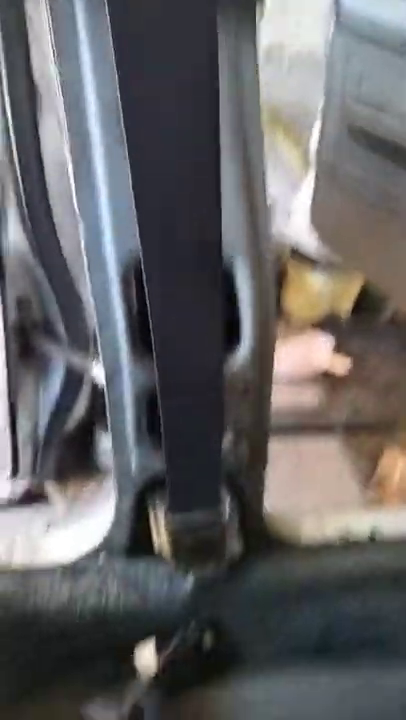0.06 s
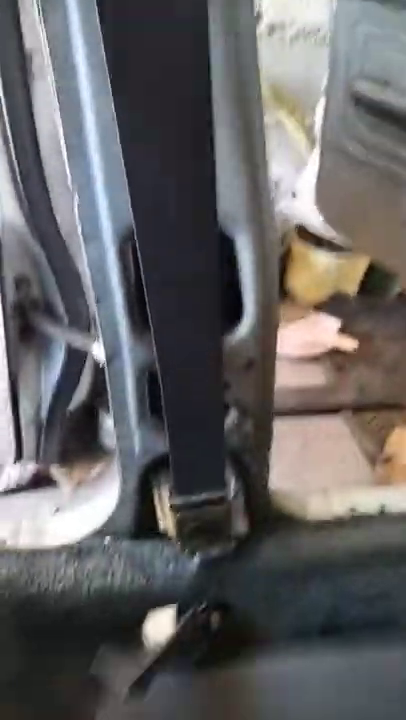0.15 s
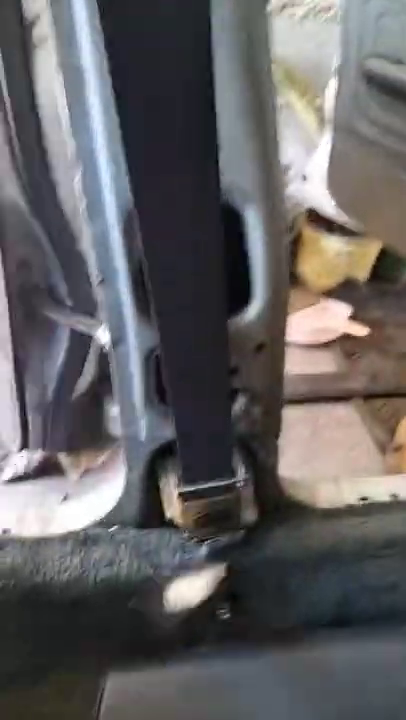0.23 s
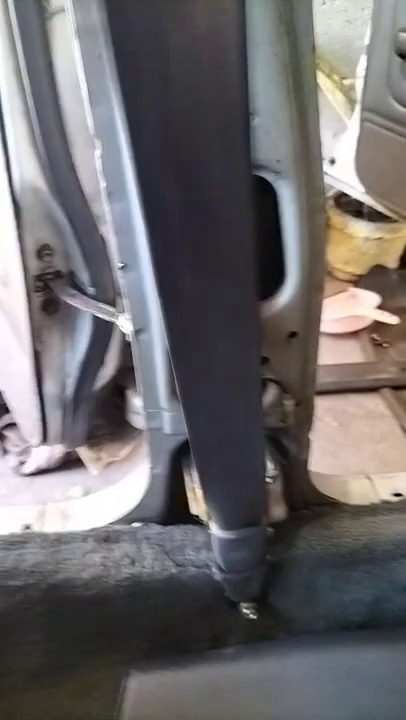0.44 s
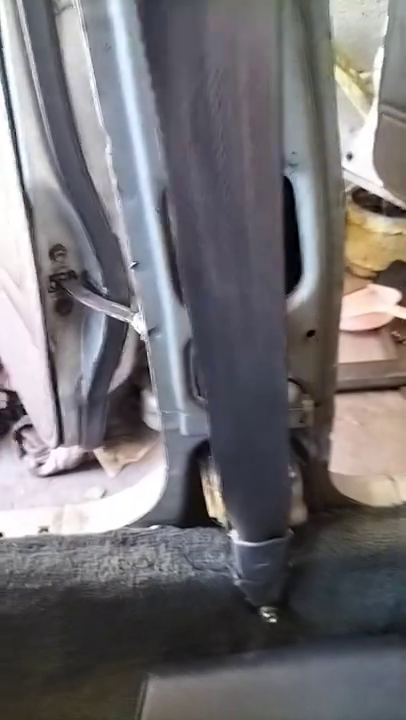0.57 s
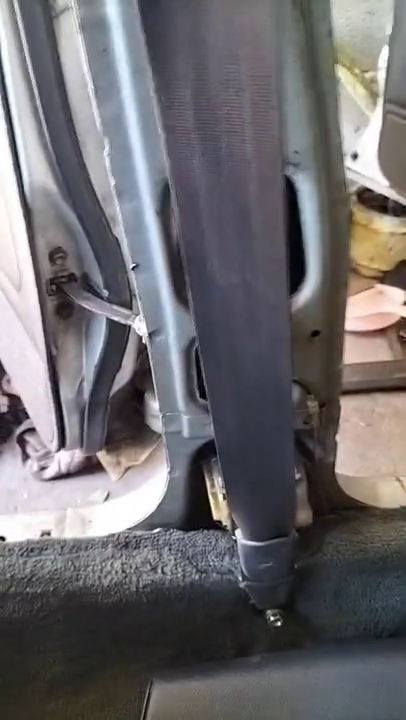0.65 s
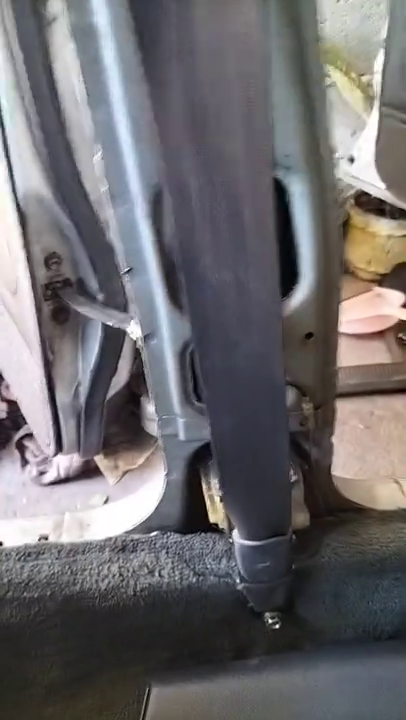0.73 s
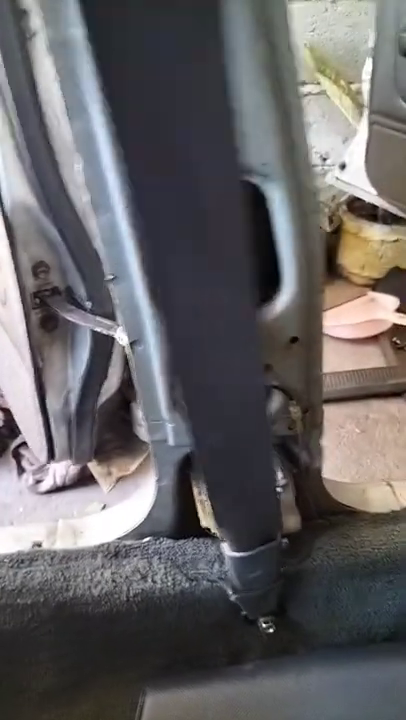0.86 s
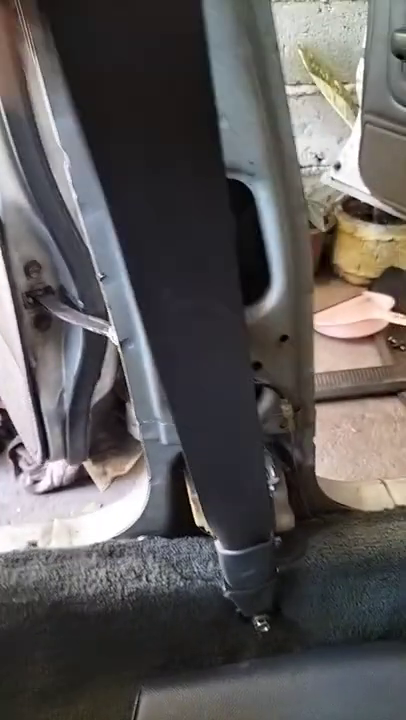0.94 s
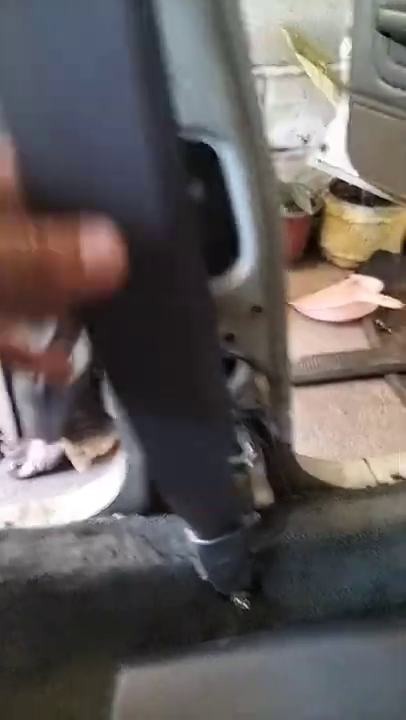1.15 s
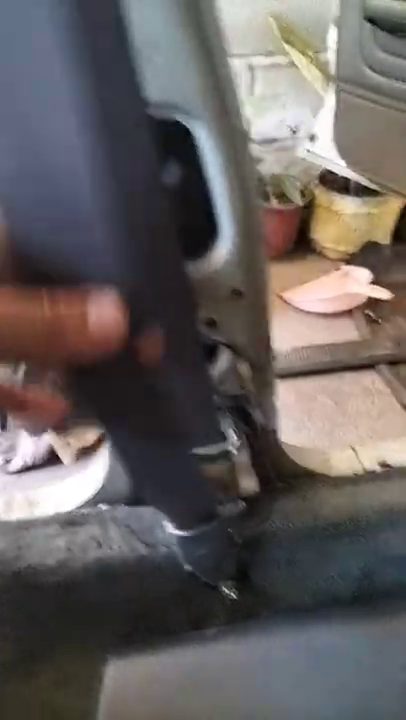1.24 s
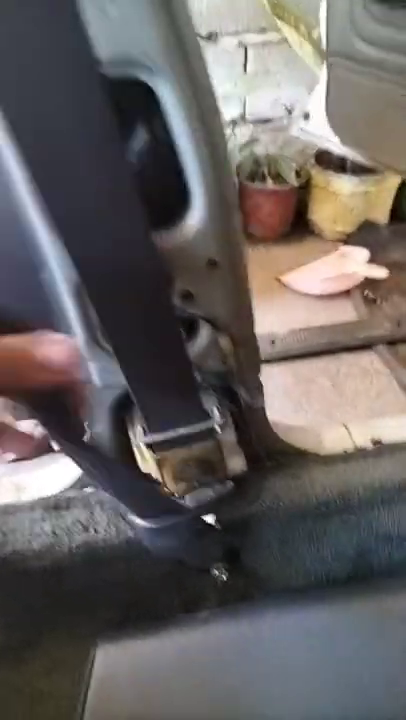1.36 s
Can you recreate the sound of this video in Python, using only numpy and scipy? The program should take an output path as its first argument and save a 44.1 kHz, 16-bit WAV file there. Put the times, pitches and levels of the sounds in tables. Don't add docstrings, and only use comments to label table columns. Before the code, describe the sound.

Seat belt webbing whips back onto its reel, whining upward, slapping and rattling before a sharp latch click; afterward small jerks, a trim creak and soft hand rubs over quiet yard air, close phone microphone.

```python
import sys
import numpy as np
from scipy import signal
from scipy.fft import rfft, irfft
from scipy.io import wavfile
from scipy.ndimage import uniform_filter1d

SR = 44100
rng = np.random.default_rng(int(sys.argv[2]) if len(sys.argv) > 2 else 0)


def store_wav(level_fs):
    pcm = np.round(np.clip(np.atleast_2d(level_fs), -1, 1) * 32767)
    wavfile.write(sys.argv[1], SR, pcm.T.astype(np.int16))


def attenuation_scalar(level_db):
    decades = np.asarray(level_db, float) / 20
    return 10 ** decades


N = 61739


def evened(x):
    return x / np.sqrt(np.mean(x ** 2) + 1e-20)


def curve(points, column=1):
    p = np.array(points)
    return np.interp(np.arange(N) / SR, p[:, 0], p[:, column])


def colour(x, points):
    f, db = np.transpose(points)
    hz = np.fft.rfftfreq(len(x), 1 / SR)
    gain = attenuation_scalar(np.interp(np.log(hz + 1), np.log(f + 1), db, -90, -90))
    return evened(irfft(rfft(x) * gain, len(x)))


def drift(seconds):
    size = max(int(seconds * SR), 2)
    return evened(uniform_filter1d(uniform_filter1d(rng.standard_normal(N), size), size))


def resonate(x, hz, width):
    turn = np.exp(2j * np.pi * hz * np.arange(len(x)) / SR)
    r = np.exp(-np.pi * width / SR)
    return 2 * (turn * signal.lfilter([1 - r], [1, -r], x / turn)).real


def twice(x, hz, width):
    return resonate(resonate(x, hz, width), hz, width)


def ring(modes, cycles, tune):
    t = np.arange(4000) / SR
    out = np.zeros(4000)
    for (hz, db), k in zip(modes, tune):
        out += attenuation_scalar(db - 60 * t * hz / cycles) * np.sin(2 * np.pi * hz * k * t)
    return np.minimum(t / 0.0004, 1) * out


def add(mix, s, sound):
    part = mix[round(s * SR):][:len(sound)]
    part += sound[:len(part)]


def grains(per_s, spread_db):
    u = rng.random((N, 2))
    size = attenuation_scalar(-spread_db * np.log(u[:, 1] + 0.03))
    return (u[:, 0] < per_s / SR) * size * rng.standard_normal(N)


def echo(x, t60):
    tail = rng.standard_normal(12000) * attenuation_scalar(-60 * np.arange(12000) / SR / t60)
    return signal.fftconvolve(x, tail / np.linalg.norm(tail))[:N]


def glides(table, wobble, smear_s):
    out = np.zeros(N)
    for s, length, db, first_hz, last_hz in table:
        u = np.arange(0, length, 1 / SR) / length
        z = uniform_filter1d(rng.standard_normal((2, 9000)), max(int(smear_s * SR), 2))
        z = z[:, :len(u)] * np.sqrt(smear_s * SR)
        turn = np.exp(2j * np.pi * np.cumsum(first_hz + (last_hz - first_hz) * u) / SR)
        blurred = (turn * (1 - wobble + wobble * (z[0] + 1j * z[1]))).real
        add(out, s, attenuation_scalar(db + 4.5) * np.sin(np.pi * u) ** 0.42 * blurred)
    return out


def streaks(x):
    width_share, wander_db = .02, 4.
    out = np.zeros(N)
    for hz in np.geomspace(1200, 8500, num=36):
        out += attenuation_scalar(wander_db * drift(.06)) * resonate(x, hz, width_share * hz)
    return evened(out)


def yard():
    # pitch_hz, level_db
    air = [(25, -33), (71, -0.5), (359, -10), (800, -9), (1000, -16.5), (2050, -20.5), (3700, -14),
           (5000, -23.5), (8500, -32.5)]
    # pitch_hz, width_hz, level_db
    hums = [(39.2, 5.5, -88.5), (62.8, 14, -77.5), (87.7, 13, -79.5), (175.6, 23, -89)]
    # time_s, level_db
    swell = [(0, -7.5), (.7, 0.5), (1.05, 1.5), (1.2, 10), (1.4, 2)]
    drone = sum(attenuation_scalar(db) * evened(twice(rng.standard_normal(N), hz, w)) for hz, w, db in hums)
    breeze = attenuation_scalar(-73.5 + 0.86 * drift(0.11)) * colour(rng.standard_normal(N), air)
    return breeze + attenuation_scalar(curve(swell)) * drone


def sparrows():
    # start_s, length_s, level_db, first_hz, last_hz
    chirps = [(.6, .045, -67, 4000, 3450), (.738, .028, -63, 2930, 2800), (.765, .025, -76, 2700, 2450),
              (.755, .04, -75, 4300, 4050), (.88, .045, -75, 3100, 2900), (1.19, .03, -69, 3880, 3780),
              (1.21, .03, -71, 3600, 3300), (1.345, .03, -72, 4100, 3800), (1.355, .045, -69, 3600, 3450),
              (1.37, .03, -75, 4520, 4480)]
    out = glides(chirps, .35, .004)
    return out + attenuation_scalar(-8) * echo(out, .1)


def rub():
    # time_s, level_db
    strokes = [
        [(0, -70), (.054, -74), (.06, -62.5), (.11, -72)],
        [(.86, -87), (.92, -70.5), (1, -69.5), (1.09, -65.5), (1.4, -71)],
    ]
    # pitch_hz, level_db
    cloth = [(1000, -3), (1900, -10), (3770, -2.5), (6980, -3.5), (8000, -9), (9500, -22.5)]
    level_db = curve(strokes[0] + [(.2, -99), (.75, -99)] + strokes[1])
    return attenuation_scalar(level_db - 3.5) * streaks(colour(grains(5600, 0.63), cloth))


def swishes():
    # start_s, length_s, level_db, first_hz, last_hz
    sweeps = [(1.1, 0.053, -71, 5100, 4700), (1.06, 0.092, -78.5, 6000, 5600),
              (0.96, 0.063, -76.5, 7200, 8000), (1.25, .07, -74, 5200, 4800),
              (.058, 0.031, -74.5, 7900, 5500), (0.071, 0.016, -87, 5100, 2800),
              (0.81, .05, -76, 2500, 3100), (1.4, 0.056, -79, 5300, 5000), (1.3, .07, -82.5, 8300, 5900),
              (1.03, 0.074, -86, 8600, 7400)]
    return glides(sweeps, 0.73, 0.006)


def creaks():
    # start_s, length_s, level_db, slip_rate_hz, roughness (0-1)
    slipping = [(.948, .054, -54.5, 344, .05)]
    # pitch_hz, width_hz, level_db
    trim = [(345, 90, -20), (470, 90, -8), (689, 90, -1), (830, 120, -8), (1030, 50, -1), (1400, 250, -8),
            (1650, 200, -11), (2300, 500, -11)]
    grit = .16
    out, t = np.zeros(N), np.arange(8000) / SR
    for s, length, db, hz, rough in slipping:
        z = rng.standard_normal((2, 8000))
        turns = np.cumsum(hz * (1 + 8.0 * rough * uniform_filter1d(z[0], 150))) / SR
        slips = np.diff(np.floor(turns), prepend=0) * (1 + rough * z[1]) + grit * z[1]
        rise = t / (0.13 * length * (1.05 - rough))
        fall = (length - t) / (0.31 * length)
        push = slips * np.clip(np.minimum(rise, fall), 0, 1)
        body = sum(attenuation_scalar(g) * resonate(resonate(push, f, w), f, 2 * w) / w for f, w, g in trim)
        add(out, s, attenuation_scalar(db) * body / np.std(body[:round(length * SR)]))
    return out


def jerks():
    # start_s, length_s, level_db
    tugs = [(.8155, .03, -61.5), (.84, 0.043, -68.5), (.912, 0.06, -64.5), (1.05, 0.15, -80),
            (0.06, 0.035, -74.5)]
    # pitch_hz, width_hz, level_db
    slot = [(307, 180, -8), (592, 190, -2), (824, 97, -5.5), (1069, 170, -0.5), (1215, 30, -9),
            (2380, 610, -16)]
    out, t = np.zeros(N), np.arange(8000) / SR
    for s, length, db in tugs:
        fade = np.clip((length - t) / (0.21 * length), 0, 1)
        scrape = rng.standard_normal(8000) * fade * (1 + 2.2 * np.exp(-t / 0.0032))
        body = sum(attenuation_scalar(g) * twice(scrape, f, 0.79 * w) / np.sqrt(w) for f, w, g in slot)
        add(out, s, attenuation_scalar(db) * body / np.std(body[:round(length * SR)]))
    return out


def squeaks():
    # start_s, length_s, level_db, first_hz, last_hz
    songs = [(.163, 0.033, -65.5, 1530, 1570), (.187, 0.037, -61.5, 1700, 1900),
             (0.15, 0.066, -65, 3900, 4020), (0.091, 0.035, -74, 5400, 3950),
             (0.29, 0.014, -72, 2600, 3560), (.278, 0.033, -58.5, 1700, 1540),
             (0.32, 0.018, -67, 3800, 5500), (0.37, .05, -58, 2600, 4700), (0.31, .026, -49.5, 1000, 620),
             (.845, 0.035, -71, 600, 540), (.93, 0.037, -70, 324, 340), (.404, 0.028, -45.5, 600, 520),
             (.912, 0.041, -65, 1100, 1200), (1.035, 0.035, -74.5, 1400, 1600),
             (1.07, 0.12, -79, 1230, 1200), (0.9, .028, -75.5, 1045, 1022)]
    return glides(songs, .25, 0.0042)


def slaps():
    # start_s, length_s, level_db, first_hz, last_hz
    thuds = [(.435, .05, -52, 215, 170), (.19, .075, -56, 285, 315), (.38, .08, -66, 125, 95),
             (.315, .03, -49, 310, 325), (.378, .03, -46, 330, 320), (.275, .045, -60, 195, 165),
             (.48, .022, -54, 310, 300), (.535, .025, -62, 310, 330), (.48, .07, -62, 180, 140)]
    return glides(thuds, .35, 0.016)


def pawl():
    # start_s, peak_db
    hits = [
        (0.5762, -31),
        (0.5809, -54),
        (0.585, -55),
        (0.59, -74),
    ]
    # pitch_hz, level_db
    modes = [(650, -31), (1238, 3.5), (1600, 2.5), (2300, 9), (2750, 9.5), (3510, 5), (4300, 1.5),
             (5300, -17), (7100, -29.5)]
    out = np.zeros(N)
    for s, db in hits:
        detune = 1 + .015 * rng.standard_normal(len(modes))
        tap = ring(modes, 20., detune)
        add(out, s, attenuation_scalar(db) * tap / abs(tap).max())
    return out


def knocks():
    # start_s, level_db, metal_share_db, rattle_s, spot_tilt_db (per octave)
    blows = [(0.3163, -43, -13.5, 0.023, -8), (.347, -53, 0, 0.00415, 2), (0.3778, -38, -36, .02, -1),
             (.4042, -44.5, 5.5, .028, 2), (0.459, -48.5, -22, 0.0068, -10), (.482, -39, -16, 0.021, 0.5),
             (.541, -58, -34, .02, -9.5), (.333, -59, 0, .006, -4), (0.3611, -59.5, -7, 0.0033, -3),
             (0.391, -56, -5.5, 0.00624, 1), (0.448, -52, -20, .006, -9), (.494, -46, -14, 0.021, -2.5)]
    # pitch_hz, level_db
    pillar = [(322, -10), (340, 1.5), (450, -5.5), (590, 4), (720, 5), (850, 1.5), (1030, 13), (1250, -15),
              (1600, -13), (1900, -9)]
    # pitch_hz, level_db
    tongue = [(2200, -10), (2762, 2.5), (3300, 4.5), (3844, 7.5), (4250, -11), (4800, -25), (5600, -3),
              (7456, -5), (8300, -33)]
    contact = 1.
    blow, blow_s, rise_s = 2.1, .0035, 0.0061
    out, t = np.zeros(N), np.arange(2000) / SR
    for s, db, metal_db, rattle, tilt_db in blows:
        z = rng.standard_normal((4, 2000))
        chatter = z[:2] * (z[2] > contact) * np.minimum(t / rise_s, 1)
        hardest = blow * (np.arange(2000) == round(min(blow_s, rattle / 4) * SR))
        drive = (chatter + hardest) * np.exp(-3 * t / rattle)
        tune = 1 + .015 * z[3]
        spot = [(hz, g + tilt_db * np.log2(hz / 700)) for hz, g in pillar]
        low = signal.fftconvolve(drive[0], ring(spot, 16., tune))
        high = signal.fftconvolve(drive[1], ring(tongue, 26., tune))
        both = low / np.std(low[:800]) + attenuation_scalar(metal_db) * high / np.std(high[:800])
        add(out, s, attenuation_scalar(db) * both)
    return out


def rush():
    # time_s, level_db
    drag = [(.1, -78), (.17, -63.5), (.23, -62), (.3, -51.5), (.35, -43.5), (.41, -50), (.46, -50),
            (.52, -52.5), (.56, -68.5), (.6, -70.5), (.68, -83.5)]
    # pitch_hz, level_db
    fibre = [(150, -20), (330, 3), (1030, -2.5), (1500, -20.5), (3870, -6.5), (6310, -20), (7370, -24.5),
             (9000, -37.5)]
    # pitch_hz, width_hz, level_db
    guide = [(315, 33, -8), (1653, 340, -5), (2690, 1300, -8.5), (3780, 1700, -10.5), (7310, 1400, -17.5)]
    dull_s, dull_hz = 0.399, 3500
    t = np.arange(N) / SR
    snags = grains(5000, 1)
    bands = sum(attenuation_scalar(db) * evened(twice(snags, hz, w)) for hz, w, db in guide)
    full = evened(colour(snags, fibre) + attenuation_scalar(-10) * evened(bands))
    full = evened(full + attenuation_scalar(-7) * streaks(full))
    dull = signal.sosfilt(signal.butter(2, dull_hz, fs=SR, output="sos"), full)
    slow = np.clip((t - dull_s) / 0.18, 0, 1)
    on = np.clip(np.minimum(t - drag[0][0], drag[-1][0] - t) / 0.021, 0, 1)
    return on * attenuation_scalar(curve(drag) + 1.3 * drift(.008)) * ((1 - slow) * full + slow * dull)


def whine():
    # time_s, rib_rate_hz, whine_db
    belt = [(.155, 480, -78), (.178, 500, -56), (.195, 525, -72), (.216, 605, -60), (.252, 752, -58),
            (.272, 840, -48.5), (.29, 925, -59), (.332, 997, -49.5), (.362, 1020, -54)]
    # multiple, level_db
    orders = [(1, 0.5), (2, -17), (3, -24), (4, -26)]
    # pitch_hz, level_db
    loop = [(1100, -0.5), (1300, -13), (1620, 12), (1900, 12), (2300, -16), (2850, 14), (3900, 3)]
    jitter, flutter_db = .003, 1.
    t, hz = np.arange(N) / SR, curve(belt)
    turns = np.cumsum(hz * (1 + jitter * drift(0.002))) / SR
    stack = np.zeros(N)
    for k, db in orders:
        favour_db = np.interp(k * hz, *np.transpose(loop))
        stack += attenuation_scalar(db + favour_db + flutter_db * drift(0.0082)) * np.sin(2 * np.pi * k * turns)
    on = np.clip(np.minimum(t - belt[0][0], belt[-1][0] - t) / 0.013, 0, 1)
    return np.sqrt(2) * on * attenuation_scalar(curve(belt, column=2)) * stack


def scene():
    near = rush() + knocks() + pawl() + jerks()
    near = signal.sosfilt(signal.butter(4, 220, "high", fs=SR, output="sos"), near) + slaps()
    cabin = attenuation_scalar(-10) * echo(near, 0.078)
    close = whine() + creaks() + squeaks()
    hand = rub() + swishes()
    return (close + near + cabin + hand + sparrows() + yard())[None]


def grip():
    # time_s, level_db
    fingers = [(0, -90.5), (.25, -97), (.33, -86), (.37, -74.5), (.4, -90.5), (.48, -91), (.52, -99),
               (.88, -107), (.92, -92), (1.21, -91), (1.25, -82), (1.29, -90), (1.38, -87.5)]
    # pitch_hz, level_db
    sheen = [(8600, -8), (10300, -5.5), (11900, 3), (13300, -1.5), (15300, 5)]
    return attenuation_scalar(curve(fingers) + 1.6 * drift(0.017)) * colour(rng.standard_normal(N), sheen)


def band_limit(x):
    return signal.sosfilt(signal.butter(12, 15640, fs=SR, output="sos"), x)


def record(dry):
    x = signal.sosfilt(signal.butter(12, 8400, fs=SR, output="sos"), dry)
    return band_limit(x + grip())


dry = scene()
out = record(dry)
store_wav(out)
```